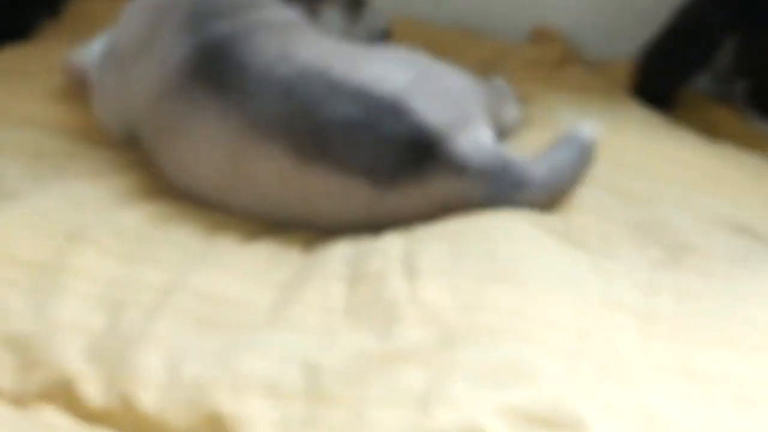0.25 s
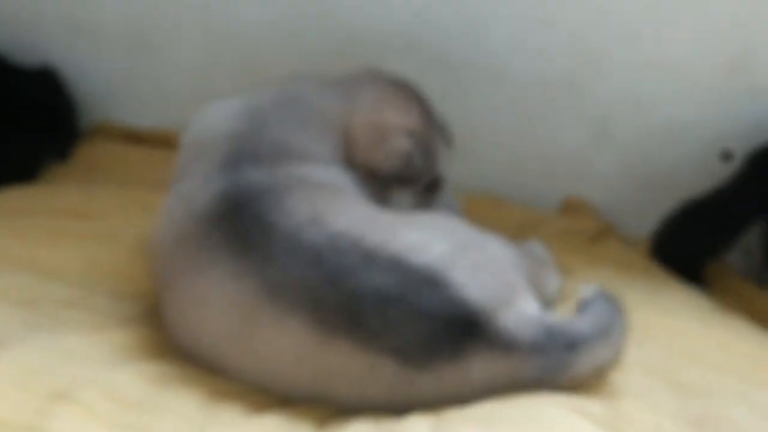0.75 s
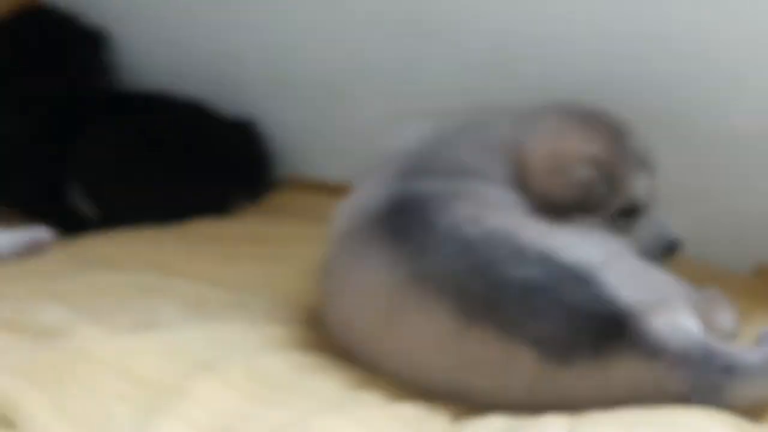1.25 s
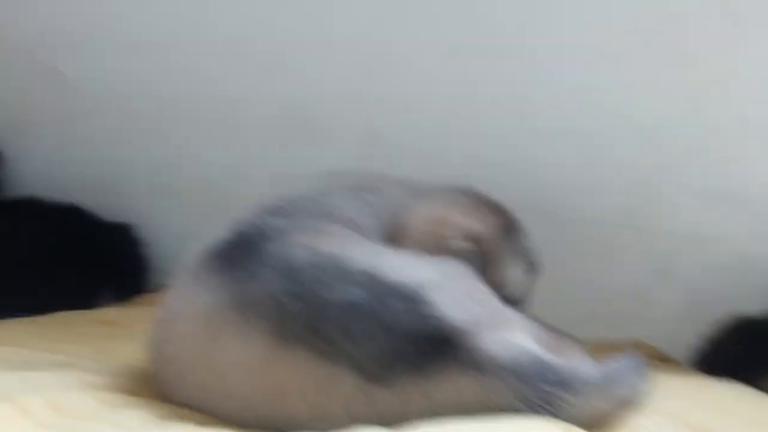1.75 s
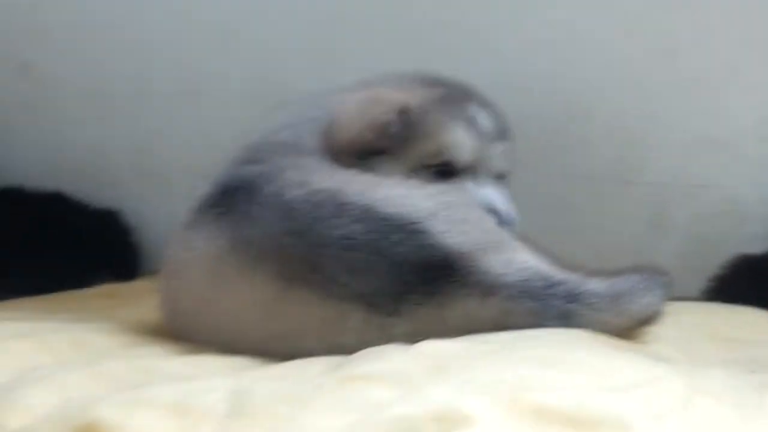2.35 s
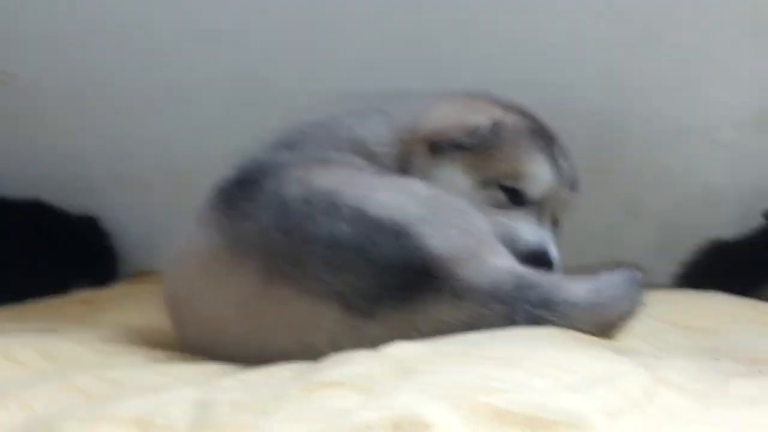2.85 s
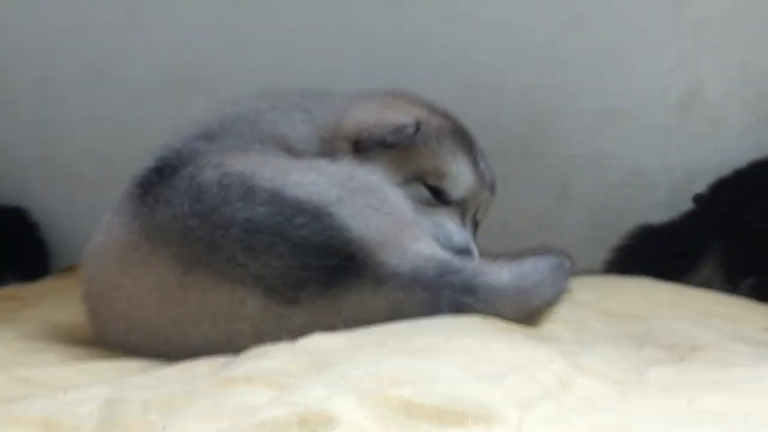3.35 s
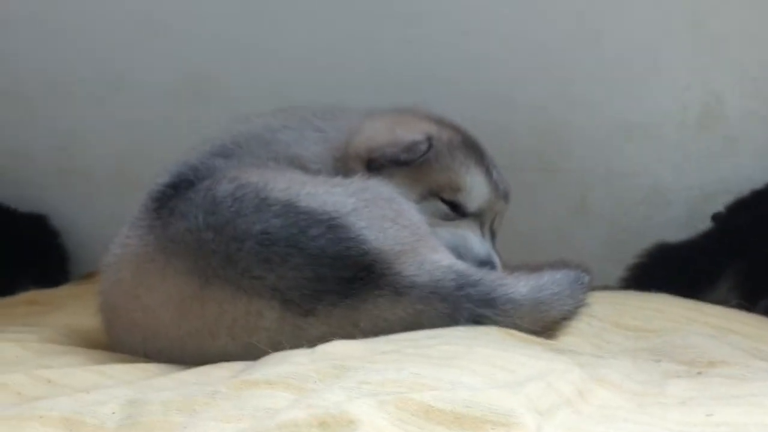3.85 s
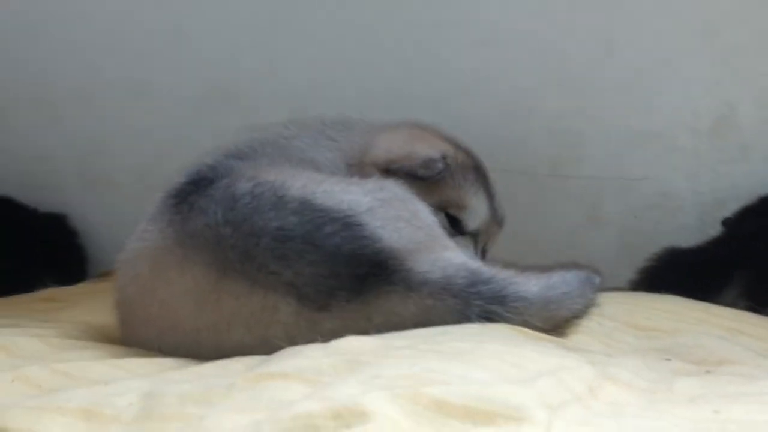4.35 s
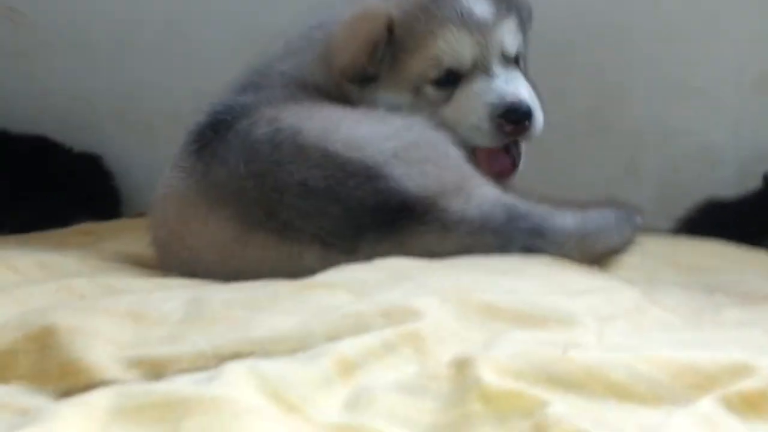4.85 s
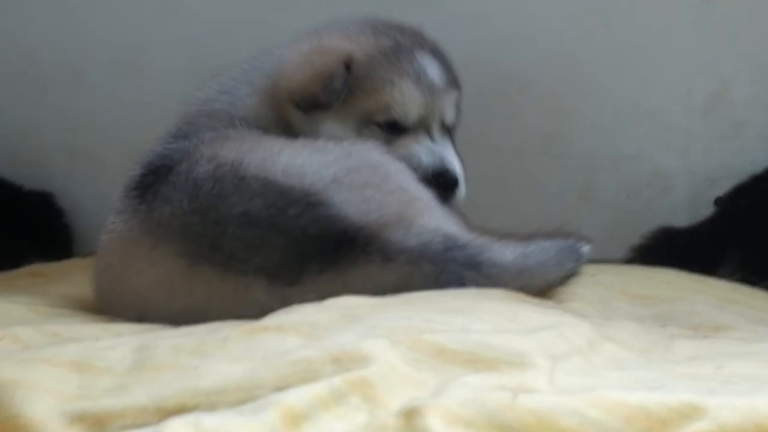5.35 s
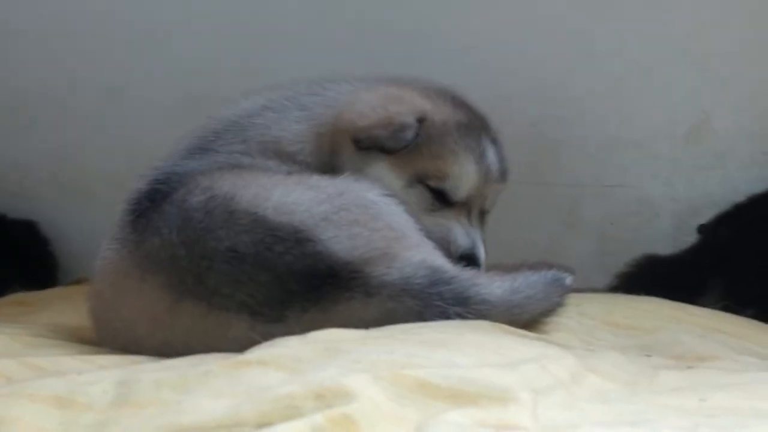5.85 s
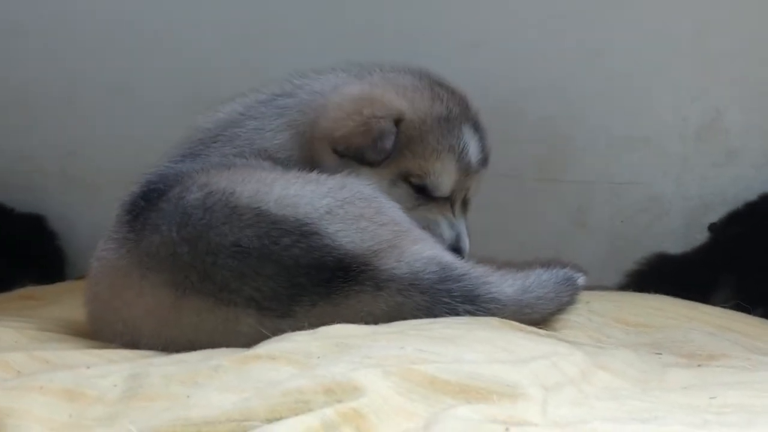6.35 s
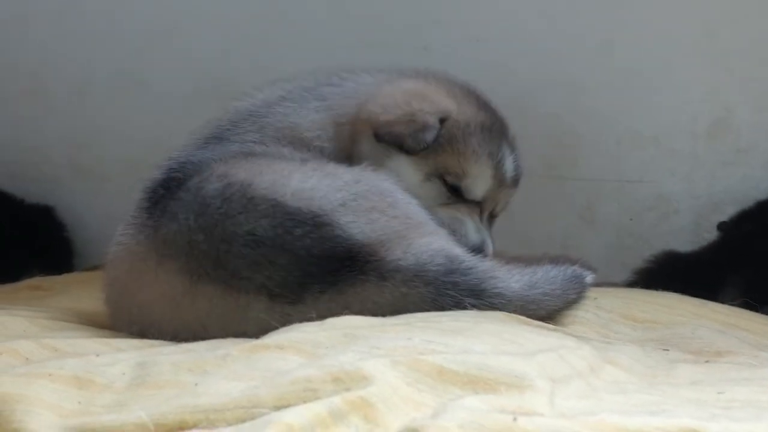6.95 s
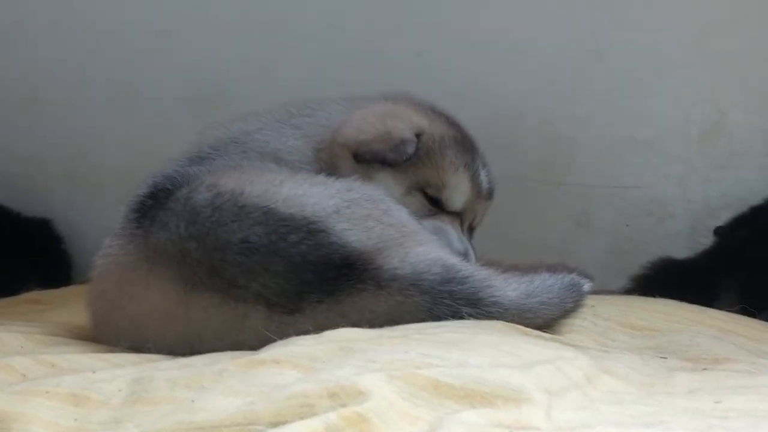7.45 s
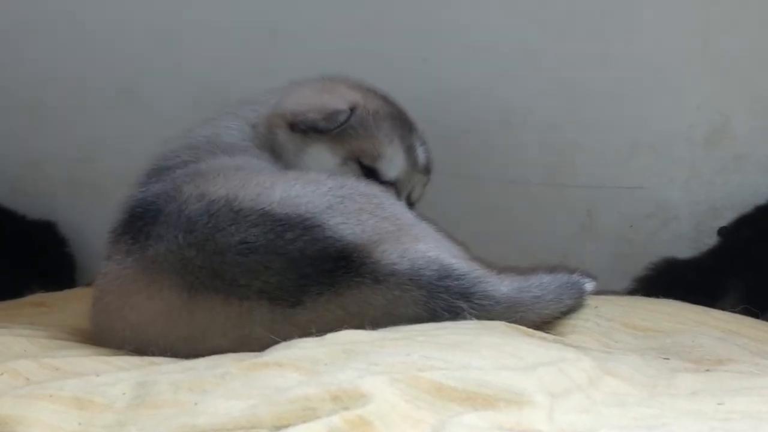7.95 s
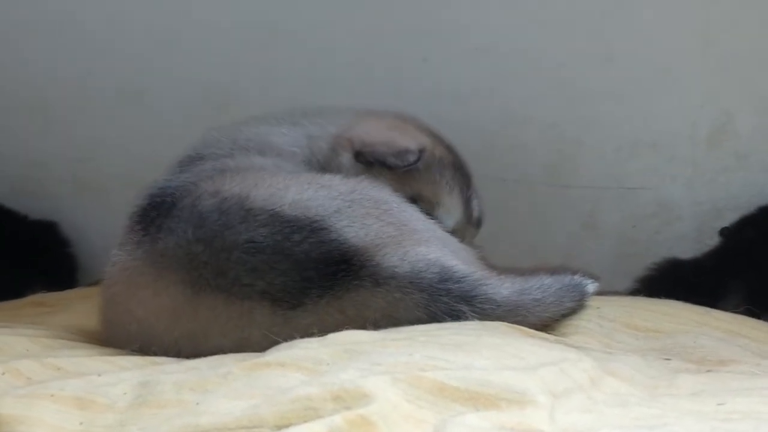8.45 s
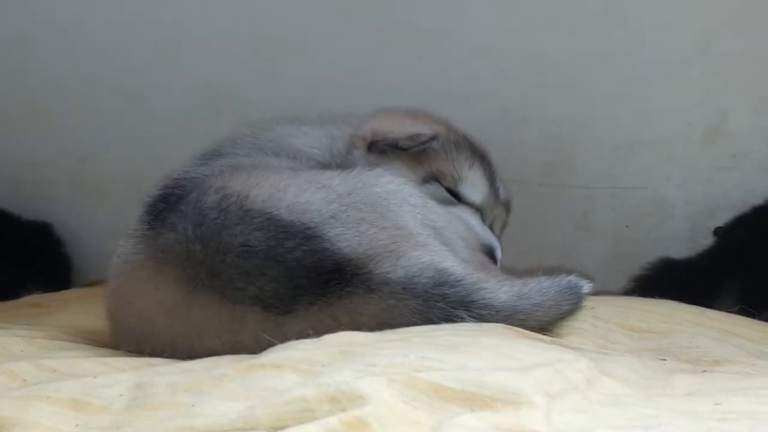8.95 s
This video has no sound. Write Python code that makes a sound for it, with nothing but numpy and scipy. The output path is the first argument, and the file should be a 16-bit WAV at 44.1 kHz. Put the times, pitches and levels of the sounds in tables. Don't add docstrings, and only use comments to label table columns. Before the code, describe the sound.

A young puppy groans and snarls, creaks, sneezes, then gives high and low wavering whines and short yips close by in a small room.

```python
import sys
import numpy as np
from scipy import signal
from scipy.fft import rfft, irfft, next_fast_len
from scipy.io import wavfile
from scipy.ndimage import uniform_filter1d

SR = 44100
rng = np.random.default_rng(int(sys.argv[2]) if len(sys.argv) > 2 else 0)


def ratio_of_db(decibels):
    return 10 ** (np.asarray(decibels, float) / 20)


def transcribe(u):
    v = np.clip(np.atleast_2d(u).T, -1, 1)
    q = np.round(v * 32767).astype(np.int16)
    wavfile.write(sys.argv[1], SR, q)


N = 405719

# f/Hz, density/dB per Hz
RUMBLE = [(15, -59), (25, -21), (75, -7), (140, -5.5), (180, -14.5), (310, -120)]
# f/Hz, density/dB per Hz
MURMUR = [(82, -45), (140, -10.5), (180, -7), (211, -3.5), (600, -11.5), (780, -65), (1320, -120)]
# f/Hz, density/dB per Hz
HISS = [(350, -46), (600, -7), (707, -5.5), (1430, -11), (1780, -11), (2540, -14), (2720, -15),
        (15600, -19)]
RUMBLE_DB, MURMUR_DB, HISS_DB = -65, -69, -67
GATE_EASE_S = 0.072

ROOM_T60_S, WALL_CUT_HZ, ROOM_DB = 0.25, 4000, -17
FAR_WALL_S, FAR_WALL_SPREAD_S, FAR_WALL_GAIN = .09, .022, .7
LATE_DB, LATE_T60_S = -20, .6
ECHO_GAP_S, ECHO_DB, ECHO_LOSS_DB = .033, -22, 2
DUCK_FROM_DB, DUCK_SPAN_DB, DUCK_DB = -33, 7, 7
FLUTTER_DB, FLUTTER_PER_S = 4, 35
GROAN_EXTRA_ROOM_DB = -3.5

# t/s, peak/dB, f/Hz, t60/s
BUMPS = [(0.218, -36, 247, 0.14), (4.75, -50, 546, 0.041), (5.7, -50, 395, 0.046),
         (8.803, -38, 243.2, 0.033), (1.272, -54, 216, 0.086), (2.036, -37, 219.5, 0.23),
         (2.368, -49.5, 212.5, 0.051), (2.585, -52, 117, 0.092), (2.68, -42, 531, 0.067),
         (4.206, -44.5, 334, 0.025), (6.13, -49.5, 299, 0.11), (6.405, -49, 261, 0.06),
         (7.72, -36, 234.7, 0.044), (8.792, -37.5, 545, 0.098)]
# peak t/s, rise/s, fall/s, level/dB, lower edge f/Hz
SNIFFS = [(.1, 0.082, 0.6, -57.5, 2500), (.75, 0.11, 0.22, -55.5, 1480), (1.0, 0.13, 0.029, -64.5, 3120),
          (1.58, .2, 0.2, -62.5, 900), (1.961, 0.0038, 0.01, -51.5, 1500), (2.33, 0.078, 0.12, -64, 2520),
          (2.8, 0.03, 0.13, -69, 2010), (3.3, .004, 0.04, -67, 6000), (3.41, 0.013, 0.083, -66.5, 4900),
          (4.83, 0.0064, 0.058, -59.5, 5540), (5.405, 0.0072, 0.03, -55, 4900),
          (7.10, 0.036, 0.034, -45.5, 298.5), (7.387, 0.028, 0.082, -53, 1510),
          (7.746, 0.019, 0.035, -51, 416)]
# f/Hz, density/dB per Hz
SNIFF_COLOUR = [(180, -4), (300, 15), (663, 4), (1020, -3), (1390, 4), (1940, -0.5), (7880, 2),
                (15500, -37)]
SNIFF_TILT_DB, TILT_PER_EDGE_DB = 2.5, -0.5
SNORT = (5.769, 0.0036, 0.11, -48.5, 1800)
SNORT_TILT_DB = -3
# t/s, peak/dB, ring f/Hz
SMACKS = [(1.564, -38, 2320), (1.96, -55, 6770), (2.3036, -46.5, 5300), (2.784, -48, 2230),
          (3.2935, -54, 1940), (3.803, -50, 7300), (4.825, -45.5, 6170), (5.9783, -49.5, 7130),
          (8.563, -47, 7150), (8.5738, -47, 6300), (8.589, -51.5, 2096), (8.9504, -48.5, 8960)]

# peak t/s, peak/dB, ring f/Hz,
# width/s
CROAKS = [(0.65, -46, 1480, 0.015), (.659, -38.5, 517, 0.0087), (.708, -44, 1490, .01),
          (.72, -43, 520, .012), (.778, -45, 480, 0.0091), (1.503, -43, 330, 0.0051),
          (1.586, -46, 236, 0.021), (1.636, -39.5, 304, 0.011), (1.4405, -41, 614, 0.0033),
          (1.4585, -33.5, 520, 0.0025), (1.4635, -44, 504, 0.0017), (1.471, -47, 760, 0.011),
          (1.4995, -35, 640, 0.0074), (1.509, -42, 680, 0.017), (1.516, -35, 490, 0.0031),
          (1.5275, -33, 570, 0.0049), (1.532, -34, 490, 0.0032), (1.5455, -34, 667, 0.01),
          (1.555, -30, 690, 0.0089), (1.568, -45, 710, 0.016), (1.579, -35, 720, 0.01),
          (1.59, -37, 697, 0.011), (1.598, -30.5, 497, 0.0019), (1.607, -44, 630, .01),
          (1.614, -36.5, 520, 0.0047), (1.626, -39, 640, 0.0076), (1.633, -38.5, 556, 0.0054),
          (1.638, -41, 516, 0.0024)]
CROAK_OCTAVE_DB = -15.5
# t/s, peak/dB
CREAKS = [(1.043, -44.5), (1.395, -41), (2.247, -32), (2.299, -32.5), (2.321, -38), (2.333, -38),
          (2.348, -48), (2.786, -41)]
UPPER_RING_DB, UPPER_RING_FOLLOWS = -5.5, 0.41
# t/s, peak/dB, ring f/Hz
SNARLS = [(.112, -34, 910), (.12, -29, 910), (.184, -32, 843), (.207, -31, 770), (.228, -30.5, 885),
          (.24, -29, 900), (.251, -27, 820), (.263, -39, 930), (.277, -33, 640)]

# t/s, pulse rate f/Hz, level/dB, roughness/0-1, mouth opening/0-1
GROAN = [(0, 148, -38, .4, 1), (.05, 144, -38, .35, .9), (.09, 150, -35, .24, .8), (.13, 146, -34, .24, .7),
         (.175, 138, -36, .2, .75), (.235, 138, -35.5, .32, .7), (.28, 147, -37, .16, .5),
         (.31, 134, -40, .12, .3)]
# t/s, pulse rate f/Hz, level/dB, roughness/0-1, mouth opening/0-1
HUM = [(0.331, 128.3, -42, 0.08, 0.13), (.37, 127.9, -40.5, 0.036, 0.16), (0.393, 123, -44, 0.044, 0.22),
       (.444, 132.8, -43, 0.045, 0.34), (.478, 129.6, -43.5, 0.048, 0.27), (.514, 134.1, -43, 0.049, 0.54),
       (0.581, 130.3, -45, 0.045, 0.28), (0.613, 118.7, -45.5, 0.13, 0.037), (.63, 115.2, -46, 0.13, 0.036)]
# t/s, pulse rate f/Hz, level/dB, roughness/0-1, mouth opening/-1 to 1
GRUNT = [
    (0.669, 109.6, -49, 0.46, -0.3),
    (0.739, 113.8, -46.5, 0.32, -0.36),
    (0.782, 117, -40.5, 0.3, -0.25),
]
# f/Hz, width/Hz, mouth shut level/dB, mouth open level/dB
THROAT = [(159, 53, -15.5, -11.5), (235, 33, -13.5, -40), (256, 560, -5, -1.5), (395, 91, 5.5, 2.5),
          (640, 74, -1.5, 5.5), (900, 87, -8, 5.5), (1044, 52, -27, 3.5), (1330, 250, -11.5, 0),
          (1500, 143, -7.5, -5.5), (1687, 180, -26, 1.5), (2020, 210, -27, -14.5), (4400, 300, -61, -13),
          (7000, 640, -17.5, -25)]
GROAN_FADE_S, GROAN_FADE_DB = 0.08, -67

# f/Hz, density/dB per Hz
SNEEZE_COLOUR = [(35, -40), (60, -13), (167, -12), (250, -2.5), (310, -6), (1230, -9), (6560, -15.5),
                 (15500, -49.5)]
SNEEZE_S, SNEEZE_DB, SNEEZE_RISE_DB_PER_S, SNEEZE_FALL_DB_PER_S = 2.02, -30.5, 1280, 137

# t/s, pitch f/Hz, fundamental level/dB
HIGH_WHINES = [
    [(3.572, 1314, -34.5), (3.605, 1315, -32.5), (3.625, 1350, -35), (3.642, 1430, -35),
     (3.658, 1407, -28.5), (3.675, 1397, -34.5), (3.695, 1332, -27), (3.73, 1325, -28.5),
     (3.742, 1298, -32.5)],
    [(4.05, 1127, -58), (4.062, 1207, -41.5), (4.108, 1344, -34), (4.284, 1258, -33), (4.318, 1169, -27.5),
     (4.366, 1165, -29.5), (4.428, 1066, -26), (4.67, 1000, -29), (4.743, 1002, -29.5)],
    [(5.068, 906, -35.5), (5.098, 908, -36), (5.184, 971.5, -30.5), (5.276, 972, -30.5),
     (5.686, 917, -29.5), (5.716, 900, -31), (5.752, 894, -27), (5.826, 863.5, -32), (5.838, 862, -34)],
]
# t/s, pitch f/Hz, fundamental level/dB
LOW_WHINES = [
    [(6.308, 727, -29.5), (6.33, 678, -26.5), (6.36, 716, -26), (6.5, 724, -22.5), (6.6, 720.4, -21.5),
     (6.716, 668, -29.5), (6.79, 652, -29), (6.884, 595.4, -29), (6.898, 610, -41.5)],
    [(7.306, 700, -32), (7.33, 635, -30), (7.41, 628, -25.5), (7.435, 664, -30.5), (7.462, 682, -29),
     (7.498, 714, -22.5), (7.518, 698, -20.5), (7.532, 636, -26), (7.577, 645.6, -29.5)],
    [(7.958, 770, -29.5), (7.97, 712, -28), (7.99, 732, -25.5), (8.035, 730, -26.5), (8.065, 716, -25),
     (8.145, 706, -23.5), (8.215, 713, -22.5), (8.32, 721, -24), (8.335, 660, -26.5)],
]
# t/s, pitch f/Hz, fundamental level/dB
YIPS = [
    [(.703, 722, -42), (.709, 726, -34.5), (.722, 716, -30), (.735, 687.7, -33.5), (.764, 713.2, -32),
     (.785, 676, -45.5), (.8, 665, -46)],
    [(5.882, 826, -36), (5.893, 812, -24), (5.91, 769, -24.5), (5.943, 758, -31.5)],
    [(8.742, 691, -54), (8.762, 721, -28.5), (8.782, 734, -27), (8.797, 713, -26.5)],
]
# start t/s, length/s, pitch f/Hz, peak/dB
LEAD_INS = [
    (.636, 0.021, 740.6, -31.5),
    (3.54, 0.028, 1399, -42.5),
    (5.051, 0.011, 1000, -40),
    (5.846, 0.026, 848, -62),
    (6.288, 0.0163, 831, -38),
    (7.268, 0.032, 791, -29.5),
    (7.94, 0.013, 900, -37.5),
]
LEAD_PEAK_AT, LEAD_FROM_DB, LEAD_TO_DB, LEAD_SAG = 0.68, -33.5, -8, -.03
# start t/s, length/s, pitch f/Hz, peak/dB
DROPS = [
    (3.748, 0.0044, 1100, -28),
    (4.745, 0.0161, 862.3, -35),
    (5.944, 0.02, 712, -22),
    (8.344, 0.0264, 640, -29.5),
    (8.799, 0.024, 602, -31.5),
]
DROP_PEAK_AT, DROP_FROM_DB, DROP_TO_DB, DROP_SAG = 0.46, -4.5, -12, .04
DROP_HALF_DB, DROP_GRIT = -40, 0.47
# peak t/s, pitch share, width/s
FLICKS = [(6.377, 0.059, 0.037), (6.406, 0.065, 0.032), (6.47, 0.069, 0.044), (6.52, 0.024, 0.037),
          (7.381, 0.1, 0.037), (8.046, 0.051, 0.023), (8.097, .09, .04), (8.119, 0.043, 0.014),
          (8.187, 0.071, 0.032), (8.263, 0.039, 0.028)]
# t/s, depth/dB, width/s
DIPS = [(0.715, 21, 0.004), (.727, 7, 0.0027), (5.946, 6, 0.0061), (5.952, -1.5, 0.0031),
        (7.311, -5, 0.0043), (0.742, 2, 0.0047), (.752, 6.5, 0.013), (3.581, 0, 0.006), (3.6, 2.5, .012),
        (3.629, 11, 0.0041), (3.64, 1, 0.0044), (3.651, 7, 0.012), (3.672, 16, 0.0081),
        (3.682, 14, 0.0078), (3.7, 8, 0.0075), (3.711, 4, 0.0063), (3.722, 4, 0.0072), (4.13, 9, 0.0094),
        (4.158, 4, 0.0067), (4.12, 7, 0.0062), (4.455, -1.5, 0.0052), (.74, 0, .005), (4.22, 4, 0.013),
        (4.266, 4, 0.006), (4.304, 13, 0.0041), (4.316, 4.5, 0.0084), (4.323, -1, 0.0081),
        (4.333, 1, 0.0047), (4.346, 3, 0.004), (4.356, 3, 0.004), (4.366, 3, 0.0036), (4.645, 6, 0.015),
        (5.362, 2, 0.032), (5.586, 3, 0.017), (5.651, 3.5, 0.036), (5.918, 3, 0.0068),
        (5.956, 4, 0.0038), (6.317, -1.5, 0.0058), (6.335, 4.5, 0.014), (6.374, 5.5, 0.011),
        (6.42, 3.5, 0.019), (6.459, 4, 0.02), (6.494, 4.5, 0.02), (6.523, 5.5, 0.031), (6.6, 1, 0.012),
        (6.786, 11, 0.008), (6.854, 5, 0.013), (7.302, 21, 0.006), (7.322, 6, 0.009),
        (7.373, 11.5, 0.0065), (7.405, 8, 0.019), (7.505, 3, .008), (7.53, 6.5, 0.021),
        (7.967, -3, 0.0075), (8.047, 3, 0.021), (8.085, 7, 0.0089), (8.099, -2, 0.0054),
        (8.119, 4, 0.018), (8.197, 6.5, 0.018), (8.272, 4, 0.016), (8.298, 1, 0.0086)]
DIP_HALF_SHARE = 2.15
# start t/s, end t/s, half-line level/dB under the note, grit/0-1
BREAKS = [(.632, .801, -40, 0.78), (6.33, 6.348, -20.5, 0.44), (6.758, 6.79, -16, 0.48),
          (6.791, 6.858, -14.5, 0.38), (6.859, 6.9, -41, 0.68), (7.304, 7.35, -16.5, 0.42),
          (7.351, 7.385, -26, 0), (7.42, 7.49, -18, 0.12), (7.939, 7.962, -22, 0.08),
          (8.031, 8.33, -41, 0.09)]
# f/Hz, level/dB
OCTAVE = [(1200, -13.5), (1350, -18.5), (1500, -29), (1650, -21), (1780, -26), (1920, -38), (2050, -43),
          (2300, -34), (2700, -48)]
# f/Hz, width/Hz, level/dB
MUZZLE = [(2840, 330, -17.5), (3904, 390, -4), (4500, 620, -0.5), (5300, 320, -13.5), (5780, 490, -17),
          (6860, 450, 4.5), (7200, 250, -1.5), (7720, 300, -13)]
NOSE_FROM_HZ = 6000
LOW_NOTE_HZ, LOW_BREATH_DB = 800, 7
# start t/s, rise/s, level/dB, drift/dB per s, nose cavity level/dB
STRAINS = [(.63, 0.011, -61, -99, -4), (3.572, 0.0048, -53, 14, -10), (4.049, 0.046, -53, -4, -13),
           (4.299, .001, -53, 13, -10), (4.5, .001, -53, -5, -2.5), (5.05, 0.087, -41.5, -18.5, -3.5),
           (5.72, 0.00091, -45, -18, -34), (5.85, .001, -61, -7, -8), (6.291, 0.0066, -60, 6, -3.5),
           (7.269, 0.031, -55.5, -10, -5), (7.949, .02, -58, 2.5, -5), (8.75, 0.024, -61, 7, -3)]
STRAIN_FROM_DB = -34


def in_time(rows):
    s, *columns = np.transpose(rows)
    return [np.interp(np.arange(N) / SR, s, c) for c in columns]


def during(spans, edge_s):
    out = np.zeros(N)
    for start, end, value in spans:
        out[round(start * SR):round(end * SR)] = value
    return uniform_filter1d(out, max(round(edge_s * SR), 1))


def rms_one(x):
    return x / np.sqrt(np.mean(x ** 2) + 1e-20)


def drift(rate):
    r = np.exp(-2 * np.pi * rate / SR)
    noise = rng.standard_normal(N + 20000)
    return rms_one(signal.lfilter([1], [1, -2 * r, r * r], noise)[20000:])


def coloured(spectrum, tilt_db=0):
    size = next_fast_len(N, real=True)
    hz, points = np.fft.rfftfreq(size, 1 / SR) + 1, np.array(spectrum)
    shape_db = np.interp(np.log(hz), np.log(points[:, 0]), points[:, 1])
    shape_db += tilt_db * np.log2(np.maximum(hz, 1000) / 5000)
    return rms_one(irfft(rfft(rng.standard_normal(size)) * ratio_of_db(shape_db), size)[:N])


def resonance(x, hz, width_hz):
    r = np.exp(-np.pi * width_hz / SR)
    zeros = np.array([1, 0, -1]) * (1 - r * r) / 2
    poles = [1, -2 * r * np.cos(2 * np.pi * hz / SR), r * r]
    return signal.lfilter(zeros, poles, x + 1e-18)


def add_ring(out, s, peak_db, hz, t60, rise_s):
    first = round(s * SR)
    t = np.arange(min(round(.3 * SR), N - first)) / SR
    shape = (1 - np.exp(-t / rise_s)) * ratio_of_db(-60 * t / t60)
    out[first:][:len(t)] += ratio_of_db(peak_db) * shape / shape.max() * np.sin(2 * np.pi * hz * t)


def room_tone(loud_db):
    busy = np.clip((loud_db + 72.0) / 25, 0, 1)
    busy = uniform_filter1d(busy, max(round(GATE_EASE_S * SR), 1))
    lumps_db = 1.5 * drift(8)
    rumble = ratio_of_db(RUMBLE_DB - 9.2 * busy + lumps_db) * coloured(RUMBLE)
    murmur = ratio_of_db(MURMUR_DB + 5.0 * busy + 3.7 * drift(13.0)) * coloured(MURMUR)
    waver_db = .8 * drift(4)
    hiss = ratio_of_db(HISS_DB + 7.82 * busy + waver_db) * coloured(HISS)
    return rumble + murmur + hiss


def room(x):
    t = np.arange(round(.6 * SR)) / SR
    noise = rng.standard_normal(len(t)) * np.clip((t - .005) / .01, 0, 1)
    dull = signal.sosfilt(signal.butter(1, WALL_CUT_HZ, fs=SR, output="sos"), noise)
    tail = dull * ratio_of_db(-60 * t / ROOM_T60_S) + (noise - dull) * ratio_of_db(-60 * t / (0.77 * ROOM_T60_S))
    tail += dull * ratio_of_db(LATE_DB - 60 * t / LATE_T60_S)
    tail = tail * (1 + FAR_WALL_GAIN * np.exp(-((t - FAR_WALL_S) / FAR_WALL_SPREAD_S) ** 2))
    return signal.fftconvolve(x, tail / np.sqrt(np.sum(tail ** 2)))[:N]


def echoes(x):
    out = np.zeros(N)
    for k in range(1, 4):
        lag = round(k * ECHO_GAP_S * SR)
        out[lag:] += (-1) ** k * ratio_of_db(ECHO_DB - ECHO_LOSS_DB * (k - 0.5)) * x[:-lag]
    return out


def ducking(near):
    level_db = 10 * np.log10(uniform_filter1d(near ** 2, size=300) + 1e-12)
    return ratio_of_db(-DUCK_DB * np.clip((level_db - DUCK_FROM_DB) / DUCK_SPAN_DB, 0, 1))


def bumps():
    out = np.zeros(N)
    for s, peak_db, hz, t60 in BUMPS:
        add_ring(out, s, peak_db, hz, t60, rise_s=.004)
    return out


def sniffs():
    out, t = np.zeros(N), np.arange(N) / SR
    for s, rise_s, fall_s, level_db, edge_hz in [*SNIFFS, SNORT]:
        tilt_db = SNIFF_TILT_DB + TILT_PER_EDGE_DB * np.log2(edge_hz / 1000)
        if s == SNORT[0]:
            tilt_db = SNORT_TILT_DB
        late = np.maximum(t - s, 0) / fall_s
        shape = np.exp(-(np.minimum(t - s, 0) / rise_s) ** 2 - late ** 1.1)
        high_pass = signal.butter(3, edge_hz, "high", fs=SR, output="sos")
        air = signal.sosfilt(high_pass, coloured(SNIFF_COLOUR, tilt_db))
        out += ratio_of_db(level_db) * shape * rms_one(air)
    return out


def smacks():
    out, ticks = np.zeros(N), np.zeros(N)
    for s, peak_db, hz in SMACKS:
        add_ring(out, s, peak_db - 3.0, hz, t60=0.034, rise_s=0.00016)
        add_ring(ticks, s, peak_db - 9.0, 30, t60=0.017, rise_s=.0001)
    return out + 5.0 * ticks * coloured(SNIFF_COLOUR)


def croaks():
    out, t = np.zeros(N), np.arange(-900, 900) / SR
    for s, peak_db, hz, width_s in CROAKS:
        ring = np.cos(2 * np.pi * hz * t) + ratio_of_db(CROAK_OCTAVE_DB) * np.cos(4 * np.pi * hz * t)
        out[round(s * SR) - 900:][:len(t)] -= ratio_of_db(peak_db) * np.exp(-(2 * t / width_s) ** 2) * ring
    return out


def creaks(low_hz=470, high_hz=720):
    out, swell_s = np.zeros(N), .003
    for s, peak_db in CREAKS:
        balance_db = UPPER_RING_DB + UPPER_RING_FOLLOWS * (peak_db + 35) + 3 * rng.standard_normal()
        add_ring(out, s, peak_db - 5.5 - balance_db / 2, low_hz, t60=0.0082, rise_s=swell_s)
        add_ring(out, s, peak_db - 7.5 + balance_db / 2, high_hz, t60=0.024, rise_s=swell_s)
        add_ring(out, s + 0.00031, peak_db - 30.0, 1350, t60=0.0056, rise_s=swell_s)
    return -out


def snarls():
    out = np.zeros(N)
    for s, peak_db, hz in SNARLS:
        add_ring(out, s, peak_db, hz, t60=0.032, rise_s=0.0012)
    return out


def groan():
    rate, level_db, rough, opening = in_time([*GROAN, *HUM, *GRUNT])
    rough, opening = np.clip(rough, 0, .6), np.clip(opening, -1, 1)
    cycles = np.cumsum(rate * (1 + .09 * rough * drift(120))) / SR
    pulses = 18 * np.diff(np.floor(cycles), prepend=0) * ratio_of_db(4 * rough * rng.standard_normal(N))
    breath = 1.5 * rough * rng.standard_normal(N) * (1 + np.cos(2 * np.pi * cycles))
    source = signal.sosfilt(np.tile([-.9, 1, 0, 1, -.9, 0], (24, 1)), pulses + breath)
    source = np.roll(source, -round(.012 * SR))
    voice = np.zeros(N)
    for k, (hz, width, shut_db, open_db) in enumerate(THROAT):
        gain = ratio_of_db(shut_db + (open_db - shut_db) * opening) / np.sqrt(width)
        voice += (-1) ** k * gain * resonance(source, hz, width)
    voice = signal.sosfilt(signal.butter(4, 120, "high", fs=SR, output="sos"), voice)
    even = voice / np.sqrt(uniform_filter1d(voice ** 2, 3000) + 1e-12)
    after = np.maximum(np.arange(N) / SR - GRUNT[-1][0], 0)
    return even * ratio_of_db(level_db + GROAN_FADE_DB * after / GROAN_FADE_S)


def sneeze():
    late = np.arange(N) / SR - SNEEZE_S
    level_db = SNEEZE_DB + np.minimum(SNEEZE_RISE_DB_PER_S * late, -SNEEZE_FALL_DB_PER_S * late)
    splutter_db = 1.0 * drift(100)
    return ratio_of_db(level_db + splutter_db) * coloured(SNEEZE_COLOUR)


def grace(rows, peak_at, from_db, to_db, sag):
    return [[(s, hz, db + from_db),
             (s + 0.54 * peak_at * length, hz, db + 0.2 * from_db),
             (s + peak_at * length, hz, db),
             (s + length, hz * (1 - sag), db + to_db)] for s, length, hz, db in rows]


def strain():
    t, out, nose = np.arange(N) / SR, np.full(N, -90.), np.zeros(N)
    for s, rise_s, level_db, db_per_s, nose_db in STRAINS:
        first = round((s - .01) * SR)
        late = np.maximum(t[first:] - s, 0)
        rise_db = STRAIN_FROM_DB * np.exp(-late / rise_s) * (rise_s > .005)
        out[first:] = level_db + rise_db + db_per_s * np.minimum(late, 1)
        nose[first:] = nose_db
    return uniform_filter1d(out, size=600), uniform_filter1d(nose, size=2000)


def upper_partials(pitch, turn, grit, nose_db, breath_db=-9):
    upper = 0
    for k in range(3, 14):
        gain = sum(ratio_of_db(db + nose_db * (hz > NOSE_FROM_HZ)) / (1 + (2 * (k * pitch - hz) / width) ** 4)
                   for hz, width, db in MUZZLE)
        upper = upper + gain * ratio_of_db(3.35 * drift(36)) * np.sin(k * turn + k * k)
    air = rms_one(sum(ratio_of_db(db) * resonance(rng.standard_normal(N), hz, width) for hz, width, db in MUZZLE))
    air_gain = ratio_of_db(breath_db + LOW_BREATH_DB * (pitch < LOW_NOTE_HZ)) + 0.78 * grit
    return np.clip(1 - 1.0 * grit, 0, 1) * ratio_of_db(-0.5) * upper + air_gain * air


def whines(wobble=0.002, flutter_db=0.44):
    lead_ins = grace(LEAD_INS, LEAD_PEAK_AT, LEAD_FROM_DB, LEAD_TO_DB, LEAD_SAG)
    drops = grace(DROPS, DROP_PEAK_AT, DROP_FROM_DB, DROP_TO_DB, DROP_SAG)
    notes = [*HIGH_WHINES, *LOW_WHINES, *YIPS, *lead_ins, *drops]
    notes = sorted(notes, key=lambda note: note[0][0])
    breaks = list(BREAKS) + [(s, s + length, DROP_HALF_DB, DROP_GRIT) for s, length, hz, db in DROPS]
    pitch, first_db = in_time(sorted(tuple(row) for note in notes for row in note))
    edge_db, nose_db = strain()
    sounding = during([(note[0][0] - .003, note[-1][0] + .003, 1) for note in notes], edge_s=.005)
    octave_db = first_db + np.interp(2 * pitch, *np.transpose(OCTAVE))
    half = during([(start, end, ratio_of_db(half_db)) for start, end, half_db, grit in breaks], edge_s=.02)
    grit = during([(start, end, np.clip(grit, 0, 1)) for start, end, half_db, grit in breaks], edge_s=0.0095)

    t, steady_db = np.arange(N) / SR, first_db.copy()
    for s, depth_db, width_s in DIPS:
        near = slice(round((s - .08) * SR), round((s + .08) * SR))
        first_db[near] -= depth_db * np.exp(-(2 * (t[near] - s) / width_s) ** 2)
    half = half * ratio_of_db(DIP_HALF_SHARE * np.minimum(steady_db - first_db, 8))
    for s, share, width_s in FLICKS:
        near = slice(round((s - .1) * SR), round((s + .1) * SR))
        pitch[near] *= 1 + share * np.exp(-(2 * (t[near] - s) / width_s) ** 2)
    shake = .05 * grit * drift(120)
    pitch = pitch * (1 + wobble * drift(23.9) + shake)
    turn = 2 * np.pi * np.cumsum(pitch) / SR

    halves = np.sin(1.5 * turn) + ratio_of_db(-14) * np.sin(turn / 2) + ratio_of_db(-18) * np.sin(2.5 * turn)
    shake_db = 0.3 * grit * drift(99)
    voice = ratio_of_db(first_db + flutter_db * drift(37) + shake_db) * np.sin(turn)
    voice += ratio_of_db(first_db + 2 * drift(25)) * half * halves
    waver_db = 2.8 * drift(44)
    voice += ratio_of_db(octave_db + waver_db - shake_db) * np.sin(2 * turn)
    smear = drift(230) * np.sin(turn) + drift(300) * np.sin(2 * turn)
    voice += ratio_of_db(first_db - 21.5) * grit * smear
    voice += ratio_of_db(edge_db - 7.0) * upper_partials(pitch, turn, grit, nose_db)
    return np.sqrt(2) * voice * sounding


def scene():
    high, low = whines(), groan() + snarls()
    near = high + low + creaks() + croaks() + smacks() + bumps() + sniffs()
    walls = ratio_of_db(ROOM_DB) * room(near + ratio_of_db(GROAN_EXTRA_ROOM_DB) * low) + echoes(near)
    flicker = ratio_of_db(FLUTTER_DB * np.clip(drift(FLUTTER_PER_S), -3, 1))
    heard = near + sneeze() + ducking(near) * walls * flicker
    hold = np.exp(-1 / (0.018 * SR))
    loud_db = 10 * np.log10(signal.lfilter([1 - hold], [1, -hold], heard ** 2) + 1e-12)
    return (heard + room_tone(loud_db))[None]


def low_pass(x):
    return signal.sosfilt(signal.butter(12, 15700, fs=SR, output="sos"), x)


def record(dry):
    return low_pass(dry)


dry = scene()
out = record(dry)
transcribe(out)
```